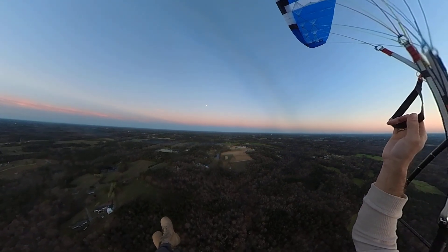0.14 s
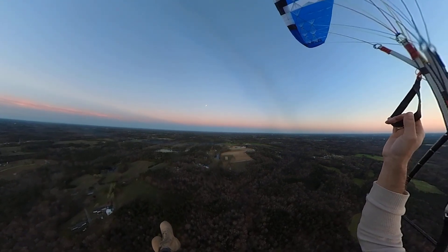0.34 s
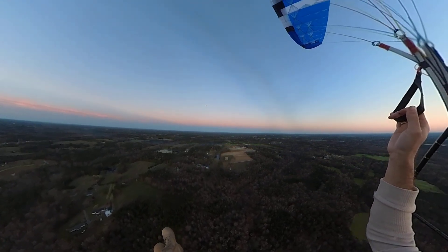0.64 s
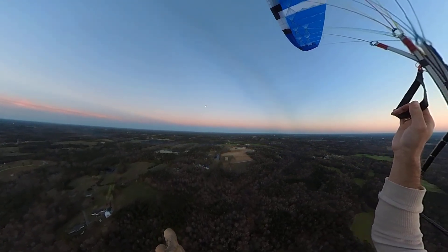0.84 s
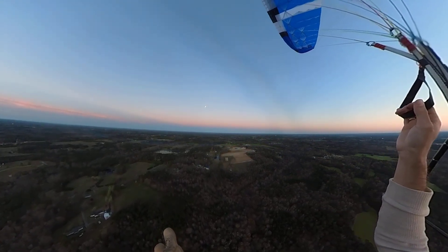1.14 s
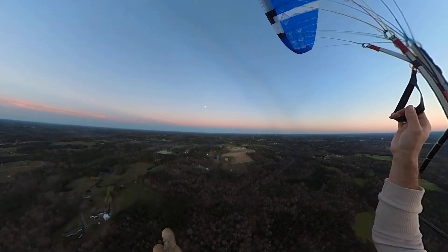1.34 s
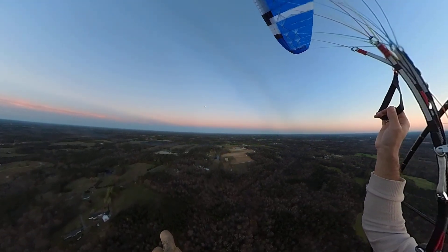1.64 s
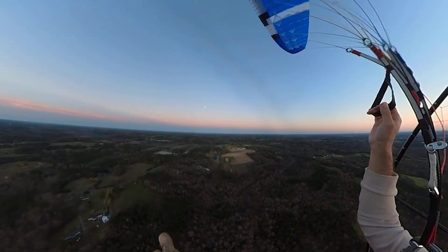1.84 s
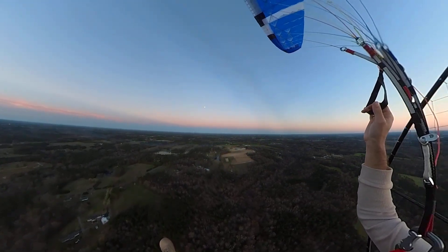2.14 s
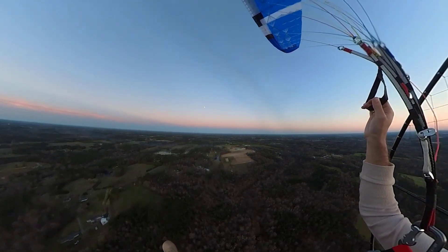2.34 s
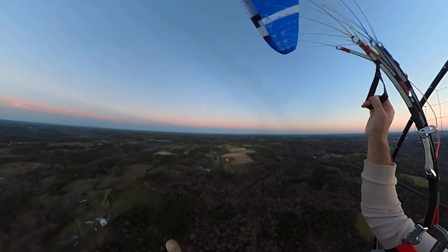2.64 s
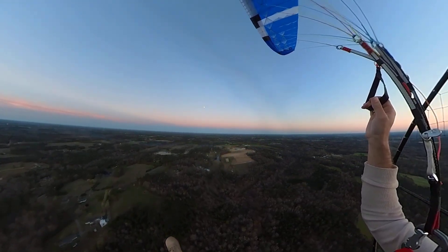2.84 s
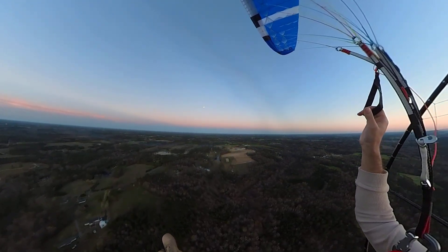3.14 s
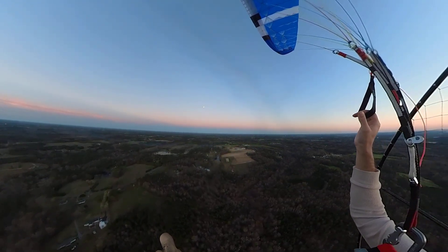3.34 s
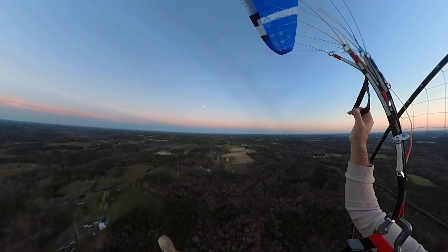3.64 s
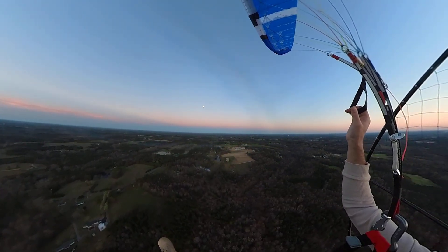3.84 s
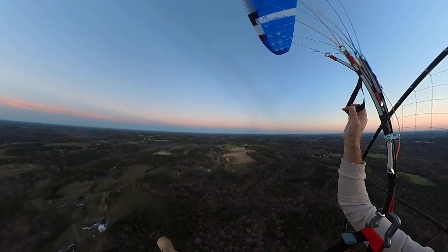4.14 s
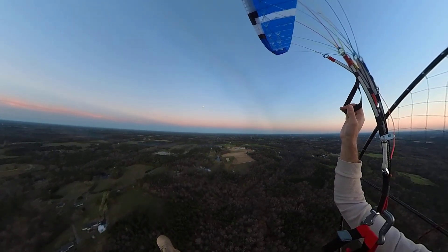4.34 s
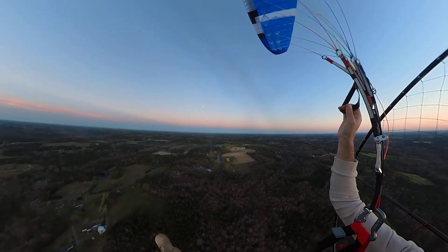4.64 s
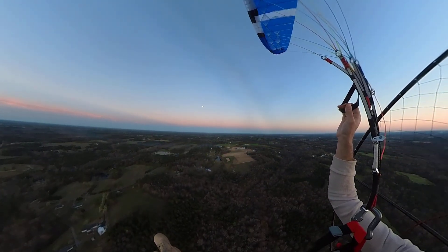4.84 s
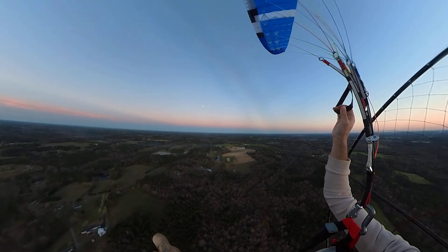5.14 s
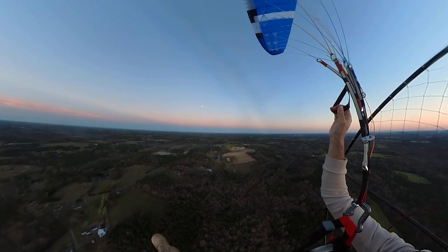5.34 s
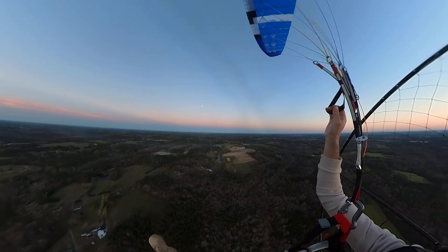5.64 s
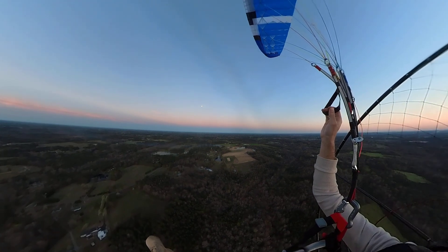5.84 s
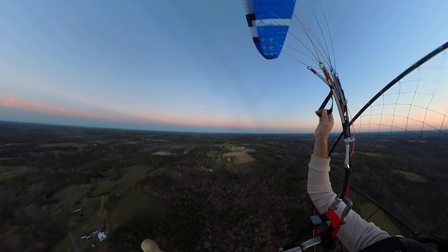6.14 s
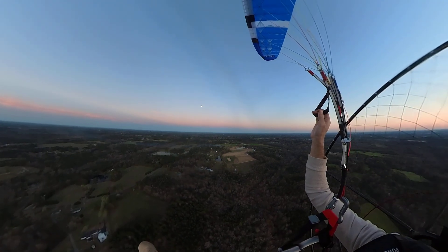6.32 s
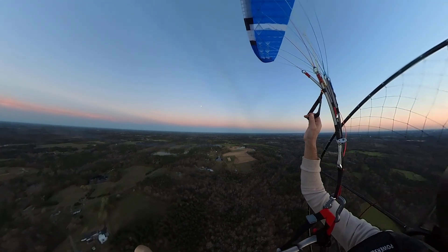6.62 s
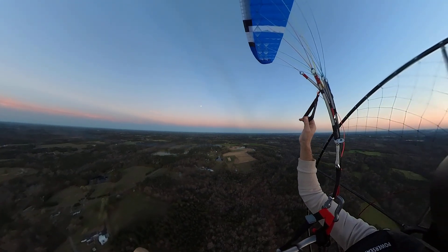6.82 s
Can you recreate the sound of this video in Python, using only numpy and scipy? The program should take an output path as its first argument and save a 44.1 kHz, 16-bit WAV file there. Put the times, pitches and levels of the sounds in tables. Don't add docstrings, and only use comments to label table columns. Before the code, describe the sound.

Close, dry, outdoor sound with no echo: a low, rough propeller hum with pulsing blade flutter, rushing wake noise, faint high hiss and sub-bass wind rumble. The throttle eases once early on, with a short burst of wind, and the pitch settles slightly lower. Near the end a swelling gust briefly swallows the bass and a loose part clicks lightly against the camera housing before the steady hum resumes.

```python
import sys
import numpy as np
from scipy import signal
from scipy.fft import rfft, irfft, next_fast_len
from scipy.io import wavfile
from scipy.ndimage import uniform_filter1d, map_coordinates

SR = 44100
rng = np.random.default_rng(int(sys.argv[2]) if len(sys.argv) > 2 else 0)


def field_ratio(decibels):
    return 10 ** (np.asarray(decibels, dtype=float) / 20)


def transcribe(signal):
    frames = np.atleast_2d(signal).T
    limited = np.clip(frames, -1, 1)
    pcm = np.round(limited * 32767).astype(np.int16)
    wavfile.write(sys.argv[1], SR, pcm)


N = 307818
BLADES = 3


def unit(x):
    return x / np.sqrt(np.mean(x ** 2) + 1e-20)


def along(points, hz):
    f, v = np.transpose(points)
    return np.interp(np.log(hz + 1), np.log(f + 1), v)


def curves(rows):
    s, *columns = np.transpose(rows)
    return [np.interp(np.arange(N) / SR, s, column) for column in columns]


def window(start, stop, rise_s, fall_s):
    t = np.arange(N) / SR
    rise = np.clip(np.minimum((np.minimum(t, stop) - start) / rise_s, 1), 0, 1)
    return rise * np.clip(1 - (t - stop) / fall_s, 0, 1)


def wobble(rate):
    coarse = np.arange(0, N + 32, 32)
    knots = rng.standard_normal(int(N * rate / SR) + 4)
    return np.interp(np.arange(N), coarse, map_coordinates(knots, [coarse * rate / SR]))


def filtered(x, response):
    m = next_fast_len(N + SR // 2)
    return irfft(rfft(x, m) * response(np.fft.rfftfreq(m, 1 / SR)), m)[:N]


def coloured(x, spectrum):
    return unit(filtered(x, lambda hz: field_ratio(along(spectrum, hz))))


def rush(spectrum, pulse_db, patchy_db):
    z = signal.stft(rng.standard_normal(N), nperseg=512)[2]
    patches = uniform_filter1d(rng.standard_normal(z.shape), 6, 0)
    patches = unit(uniform_filter1d(patches, 8, 1))
    white = signal.istft(z * field_ratio(patchy_db * patches), nperseg=512)[1][:N]
    return coloured(white * field_ratio(pulse_db), spectrum)


# (time [s], blade-pass frequency [Hz])
PROPELLER_SPEED = [(0.0, 77.4), (0.7, 77.54), (1.3, 77.37), (1.46, 76.3), (1.54, 74.8), (1.62, 72.5),
                   (1.7, 70.3), (1.78, 68.7), (1.86, 68.63), (1.96, 68.95), (2.25, 68.87), (3.2, 68.95),
                   (3.6, 69.09), (4.2, 68.86), (5.25, 68.92), (5.5, 69.01), (6.7, 69.14), (6.98, 69.08)]


def blade_rate():
    return curves(PROPELLER_SPEED)[0]


def throttle():
    return np.clip((blade_rate() - 69.5) / 7.5, 0, 1)


# (multiple of blade rate [1], level [dB])
BLADE_TONES_FAST = [(1, 2.5), (2, -24.5), (3, -12.5), (4, -16), (5, -8.5), (6, -13.5), (7, -21), (8, -16),
                    (9, -17.5), (10, -18), (11, -22), (12, -23), (13, -23.5), (14, -33.5), (15, -25.5),
                    (16, -37.5), (17, -32.5), (18, -64), (19, -32), (20, -41)]
# (multiple of blade rate [1], level [dB])
BLADE_TONES_SLOW = [(1, 1), (2, -6.5), (3, -38), (4, -12.5), (5, -11), (6, -16.5), (7, -20), (8, -18.5),
                    (9, -18), (10, -21.5), (11, -25), (12, -28.5), (13, -25), (14, -29), (15, -38),
                    (16, -30.5), (17, -28), (18, -43), (19, -51), (20, -40)]
# (shaft order [1], fast level [dB], slow level [dB])
SHAFT_TONES = [(1, -21, -20), (2, -15, -19), (4, -10.5, -5.5), (5, -26, -17), (7, -15, -14.5),
               (8, -24, -18), (10, -16, -19), (11, -26, -24), (14.525, -40, -19), (26, -36, -29),
               (28, -36, -31), (29, -34, -30), (32, -38, -29), (53, -38, -37), (56, -44, -37),
               (62, -38, -38), (65, -40, -40)]


def tones(angle):
    fast, shaft_hz = throttle(), blade_rate() / BLADES
    frame_hz, frame_width_hz, frame_db = 289.6, 9.6, 7.5
    rows = []
    for (multiple, fast_db), (_, slow_db) in zip(BLADE_TONES_FAST, BLADE_TONES_SLOW):
        rows.append((BLADES * round(multiple), fast_db, slow_db))
    total = np.zeros(N)
    for order, fast_db, slow_db in rows + SHAFT_TONES:
        unsteady = min(0.061 * order, 1.1)
        level_db = slow_db + fast * (fast_db - slow_db) + 1.3 * unsteady * wobble(6)
        level_db += frame_db * np.exp(-((order * shaft_hz - frame_hz) / frame_width_hz) ** 2)
        lag = 0.3 + 1.9 * np.exp(-((order - 11.5) / 5) ** 4)
        lag += np.pi * (order < BLADES)
        lag -= 1.1 * (order in (5, 8))
        echo = 1.5 * rng.standard_normal() * (order > 18)
        if order > 13:
            snap_lag = (2 + 0.38 * order) % (2 * np.pi)
            lag = lag + fast * (snap_lag - lag + 0.7 * echo)
        phase = order * angle - lag + echo + 0.42 * unsteady * wobble(6)
        total -= field_ratio(level_db) * np.sin(phase)
    return np.sqrt(2) * field_ratio(-25) * total


# (time [s], level [dB])
ROUGH_AIR = [(0, -3), (0.6, -0.5), (1.2, 1.5), (1.6, 4.5), (1.7, -0.5), (2.2, 0.1), (3.0, -1.5),
             (4.1, -0.5), (5.2, -1.5), (7, 1)]


def air_level(calm_db, growth):
    return field_ratio(calm_db + growth * curves(ROUGH_AIR)[0])


def puffs(angle):
    pulse = np.maximum(np.cos(BLADES * (angle + 0.12)), 0) ** 2
    return pulse * np.clip(np.abs(wobble(70)), 0, 2)


def heavy_blade(angle):
    return np.maximum(np.cos(angle + 0.3), 0) ** 9


def snaps():
    return np.clip(wobble(260) - 1.3, 0, 0.9)


# (frequency [Hz], level [dB per Hz])
BUFFET_SPECTRUM = [(12, -33), (24, -17), (42, 2.5), (62, -2), (100, 0), (190, -6), (340, -12.5), (600, -78)]
# (time [s], length [s], level over normal [dB])
BUFFET_SURGES = [
    (1.513, 0.043, 9),
    (6.023, 0.03, 7.5),
]


def buffet():
    surge_db = sum(db * window(s, s + length, 0.023, 0.008) for s, length, db in BUFFET_SURGES)
    return air_level(-31, 0.3) * field_ratio(surge_db) * rush(BUFFET_SPECTRUM, 0.94 * wobble(9), patchy_db=-1.0)


# (frequency [Hz], level [dB per Hz])
WAKE_SLOW_SPECTRUM = [(60, -19.5), (150, -1.5), (300, -3.5), (600, -6.5), (1000, -12), (1500, -18),
                      (2000, -28.5), (3000, -67.5)]
# (frequency [Hz], level [dB per Hz])
WAKE_FAST_SPECTRUM = [(60, -24.5), (150, -4.5), (300, -3), (600, -4.5), (1000, -9.5), (1500, -14),
                      (2000, -23), (3000, -71.5)]


def wake(angle):
    fast, total = throttle(), np.zeros(N)
    for share, spectrum in ((fast, WAKE_FAST_SPECTRUM), (1 - fast, WAKE_SLOW_SPECTRUM)):
        pulse_db = 1.8 * puffs(angle) + 3 * snaps()
        total += np.sqrt(share) * rush(spectrum, pulse_db, patchy_db=0.5)
    return air_level(-34, 0.31) * total


# (frequency [Hz], level [dB per Hz])
SWISH_SPECTRUM = [(600, -25), (1200, -10.5), (1700, 0.5), (2200, 0), (2900, -5.5), (3600, -15.5),
                  (4200, -23.5), (4800, -35.5), (5500, -70.5)]


def swish(angle):
    pulse_db = 3 * puffs(angle) + 3 * heavy_blade(angle) + 6 * snaps()
    return air_level(-51.5, 0.9) * rush(SWISH_SPECTRUM, pulse_db, patchy_db=1.5)


# (frequency [Hz], level [dB per Hz])
HISS_SPECTRUM = [(4200, -47.5), (4800, -26), (5200, -20), (5900, -6.5), (7260, 0.5), (8040, -4),
                 (8510, -13), (8900, -30), (9200, -45.5), (9800, -56)]


def hiss(angle):
    pulse_db = 3 * puffs(angle) + 3 * heavy_blade(angle) + 4 * snaps() + 0.5 * wobble(160)
    return air_level(-64.5, 0.93) * rush(HISS_SPECTRUM, pulse_db, patchy_db=-2.5)


# (frequency [Hz], level [dB per Hz])
CRACK_SPECTRUM = [(500, -41.5), (1000, -3.5), (1500, -0.5), (2500, -5.5), (3600, -22), (4800, -59.5),
                  (6800, -33.5), (8000, -24.5), (8700, -42)]


def cracks(angle):
    scatter_db, heavy_db, jitter_s = 2.5, 5, 0.0012
    passes = np.floor(BLADES * (angle + 0.2) / (2 * np.pi))
    at = np.flatnonzero(np.diff(passes)) + 1
    size_chance, time_chance, sign_chance = rng.standard_normal((3, len(at)))
    size_db = scatter_db * np.clip(size_chance, -2, 1.5) + heavy_db * (passes[at] % BLADES == 0)
    at = np.clip(at + np.round(jitter_s * SR * time_chance).astype(int), 0, N - 1)
    blows = np.bincount(at, field_ratio(size_db) * np.sign(sign_chance), minlength=N)
    return field_ratio(-55.5) * unit(filtered(blows, lambda hz: field_ratio(along(CRACK_SPECTRUM, hz)) * (hz < 8800)))


# (time [s], level [dB])
RUMBLE_LEVEL = [(0, -43.5), (0.7, -40.5), (1.5, -37), (1.75, -37), (2.2, -40.5), (2.7, -42.5), (3.2, -37.5),
                (3.8, -45.5), (4.9, -43), (5.2, -39), (5.6, -43), (6.98, -42.5)]
# (frequency [Hz], level [dB per Hz])
RUMBLE_SPECTRUM = [(10, -32), (22, -3.5), (40, 9.5), (52, -4.5), (70, -55)]


def rumble():
    return field_ratio(curves(RUMBLE_LEVEL)[0] - 2) * rush(RUMBLE_SPECTRUM, 2 * wobble(7), patchy_db=0.6)


# (time [s], length [s], final level [dB], swell up to it [dB], first centre [Hz], last centre [Hz])
PORT_GUSTS = [
    (1.563, 0.042, -21.5, -1.5, 380, 950),
    (1.62, 0.045, -24.5, 4.5, 500, 358),
    (5.677, 0.342, -28.5, 6.5, 270, 249),
]


def gusts(angle):
    rise_s, fall_s = 0.027, 0.027
    whistle_db, whistle_growth = -13.5, 1.3
    chop = field_ratio(1.5 * np.cos(BLADES * (angle - 0.4)))
    total = np.zeros(N)
    for start, length, db, swell, first_hz, last_hz in PORT_GUSTS:
        stop = start + length
        swell_db, centre_hz = curves([(start, -swell, first_hz), (stop, 0, last_hz)])
        shape = chop * window(start - rise_s / 2, stop, rise_s, fall_s) ** 2
        noise = rng.standard_normal(N)
        for band_hz in (200, 340, 600, 1050):
            def resonance(f):
                damping = 1j * f * 0.6 * band_hz
                return damping / (band_hz ** 2 - f * f + damping) / (1 + (f / 1450) ** 10)
            band = filtered(noise, resonance)
            power = np.abs(uniform_filter1d(band ** 2, size=700))
            even = band / np.sqrt(power + 1e-9)
            nearness = np.exp(-(np.log2(centre_hz / band_hz) / 0.84) ** 2)
            total += shape * field_ratio(db + swell_db - 5.5) * nearness * even
        whistle_level = length * field_ratio(db + whistle_db + whistle_growth * swell_db)
        total += shape * whistle_level * coloured(noise, SWISH_SPECTRUM)
    return total


# (time [s], peak level [dB])
HOUSING_TICKS = [(5.5705, -55), (5.6565, -53), (5.7019, -49), (5.7159, -43.5), (5.7326, -45), (5.744, -37),
                 (5.787, -41.5), (5.82, -43), (5.8306, -44.5), (5.8748, -43.5), (5.8884, -46.5),
                 (5.9179, -51), (5.9506, -42), (5.9609, -43), (5.9754, -62), (6.005, -45), (6.0184, -41),
                 (6.0404, -56), (6.0477, -47)]
# (frequency [Hz], level [dB], decay time by 60 dB [s])
HOUSING_MODES = [(7800, 1, 0.0048), (6900, -10, 0.004), (5960, -17.5, 0.007), (2540, 1.5, 0.0048)]


def ticks():
    attack_s, delay_s = 0.00048, 0.0009
    total, t = np.zeros(N), np.arange(400) / SR
    chance = rng.standard_normal((len(HOUSING_TICKS), len(HOUSING_MODES)))
    for (s, db), scatter in zip(HOUSING_TICKS, chance):
        ring = np.zeros(len(t))
        for k, ((hz, level, t60), r) in enumerate(zip(HOUSING_MODES, scatter)):
            strike_db = level + min(k, 1) * 4.7 * r
            ring += field_ratio(strike_db - 60 * t / t60) * np.sin(2 * np.pi * hz * t)
        total[round((s + delay_s) * SR):][:len(t)] += field_ratio(db + 6.5) * ring * (1 - np.exp(-t / attack_s))

    def port(hz):
        return (1 - 0.9 * np.exp(-((hz - 4900) / 600) ** 2)) / (1 + (hz / 9000) ** 24)
    return filtered(total, port)


def scene():
    angle = 2 * np.pi * np.cumsum(blade_rate() / BLADES) / SR + 2.96
    air = buffet() + wake(angle) + swish(angle) + hiss(angle)
    propeller = tones(angle) + air + cracks(angle) + rumble()
    return (propeller + gusts(angle) + ticks())[None]


def top_cut(x):
    return signal.sosfilt(signal.butter(12, 9700, fs=SR, output="sos"), x)


# (on time [s], off time [s], bass cut [0-1])
WIND_CUTS = [
    (1.55, 1.658, 0.44),
    (1.584, 1.621, 0.9),
    (5.676, 6.014, 0.85),
]
# (time [s], gain [dB])
GAIN_CONTROL = [(1.575, -0.5), (1.6, -2.5), (1.63, 0), (1.66, -0.5), (1.76, 0), (5.65, -0.5), (5.68, -1.5),
                (5.72, 0.5), (5.82, 3), (6.02, 2.5), (6.1, -1)]


def record(dry):
    switch_s, rest_slow, rest_fast = 0.014, 0.08, 0.031
    cut = rest_slow + (rest_fast - rest_slow) * throttle()
    for on, off, depth in WIND_CUTS:
        cut = np.maximum(cut, depth * window(on, off, switch_s, switch_s))
    thin = filtered(dry[0], lambda hz: 1 / (1 + (150 / (hz + 1)) ** 4))
    mix = (1 - cut) * dry[0] + cut * thin
    return top_cut(mix[None] * field_ratio(curves(GAIN_CONTROL)[0]))


dry = scene()
out = record(dry)
transcribe(out)
```